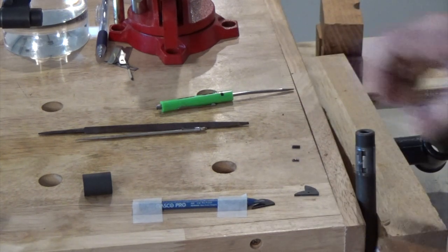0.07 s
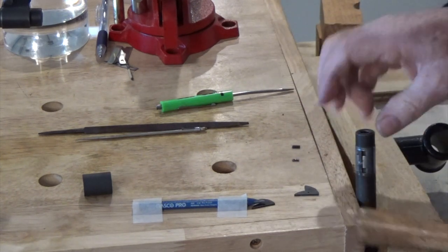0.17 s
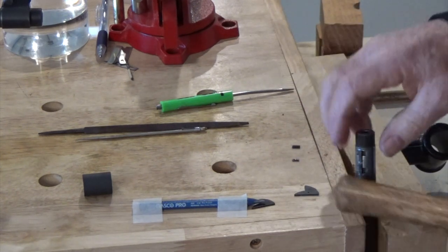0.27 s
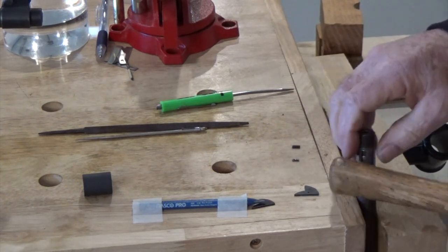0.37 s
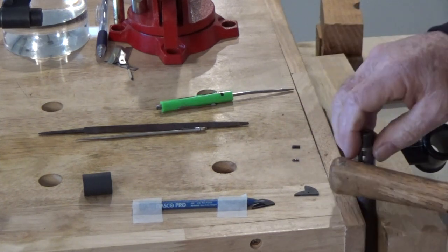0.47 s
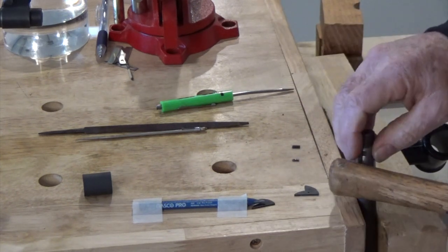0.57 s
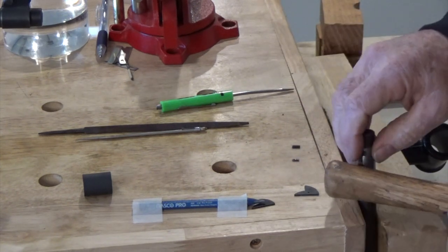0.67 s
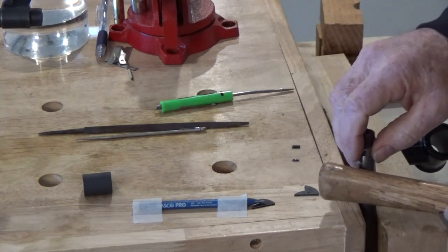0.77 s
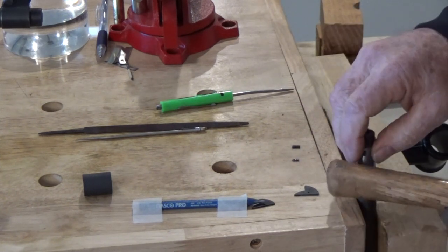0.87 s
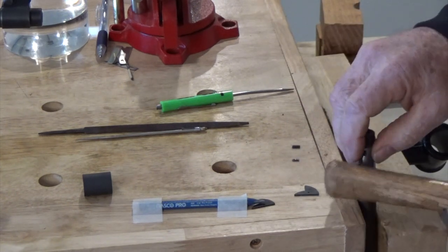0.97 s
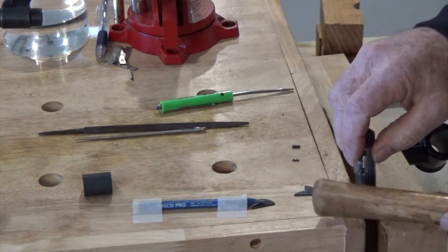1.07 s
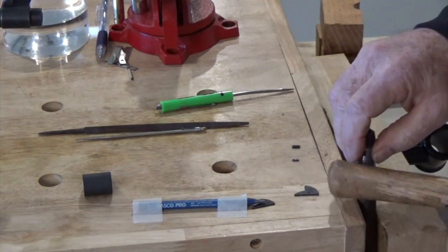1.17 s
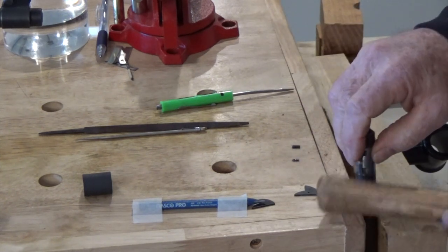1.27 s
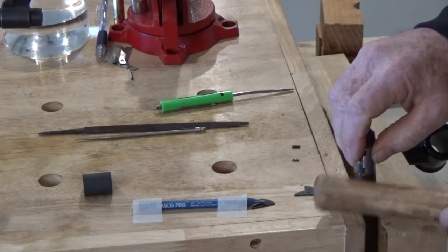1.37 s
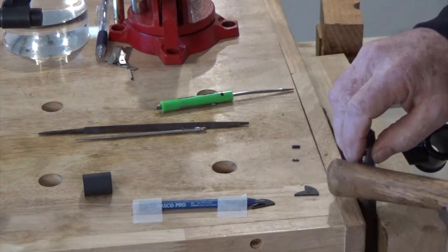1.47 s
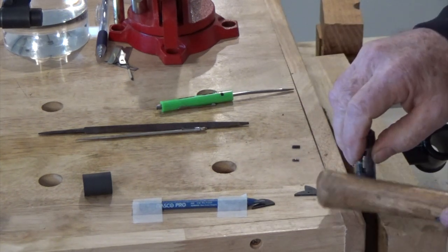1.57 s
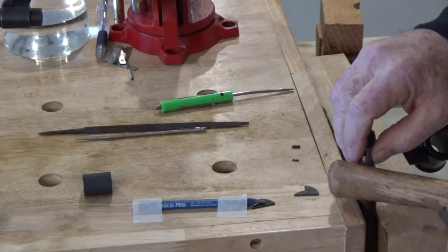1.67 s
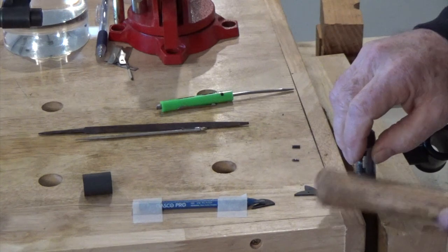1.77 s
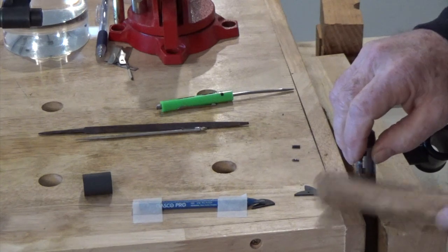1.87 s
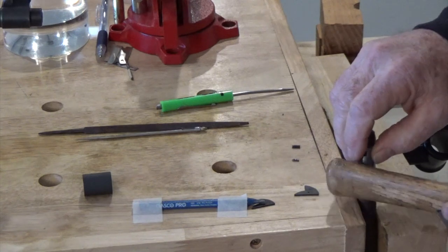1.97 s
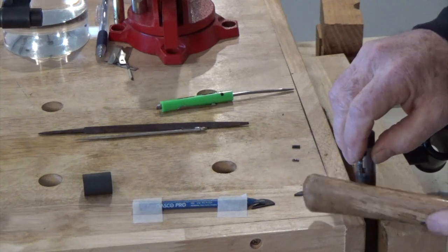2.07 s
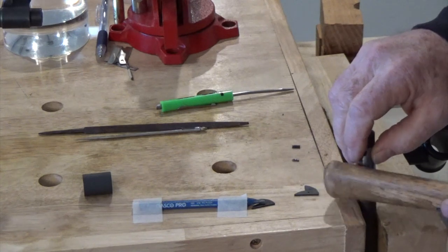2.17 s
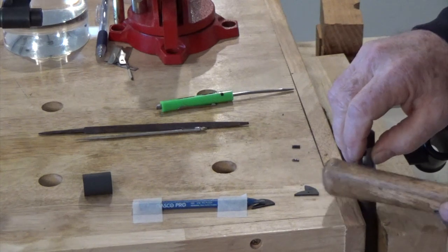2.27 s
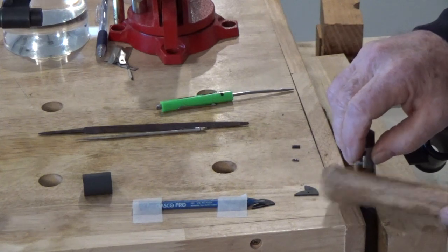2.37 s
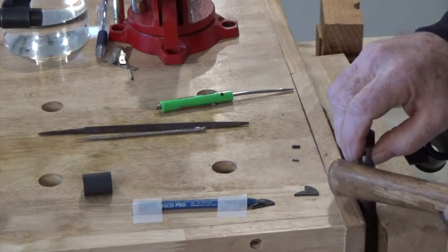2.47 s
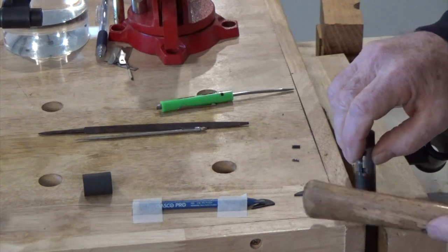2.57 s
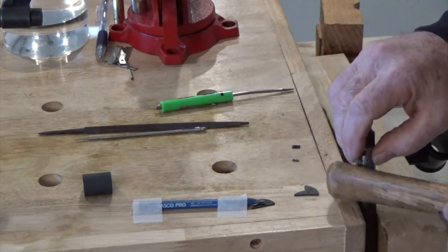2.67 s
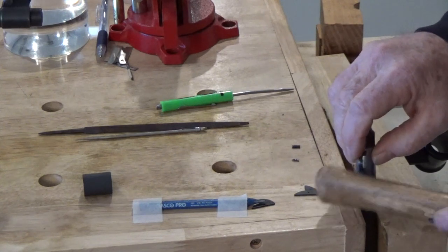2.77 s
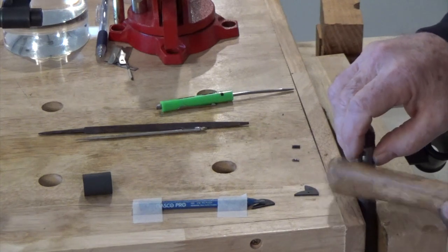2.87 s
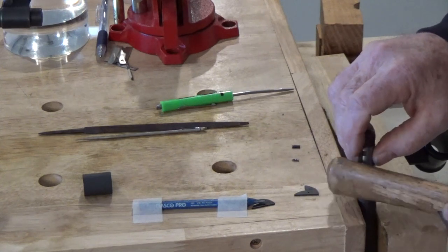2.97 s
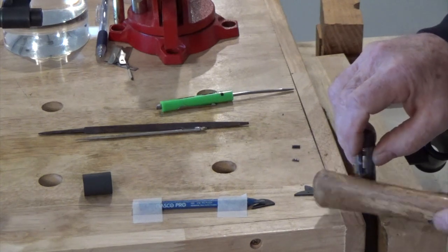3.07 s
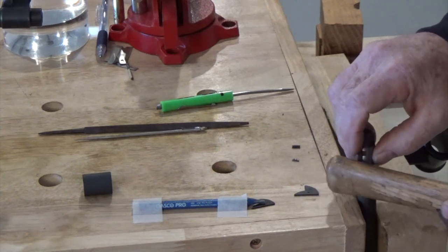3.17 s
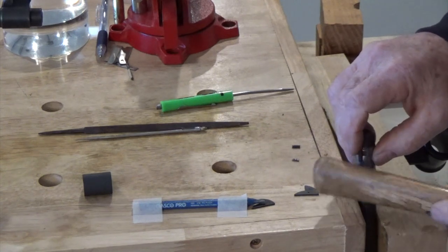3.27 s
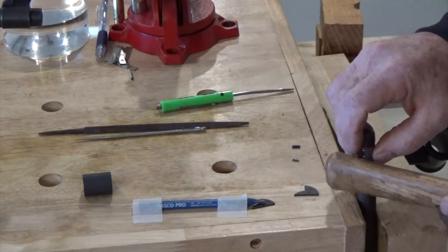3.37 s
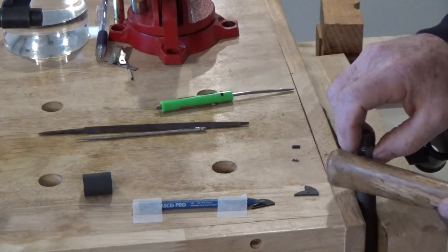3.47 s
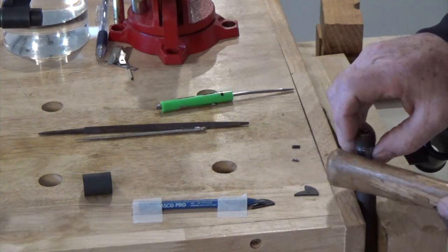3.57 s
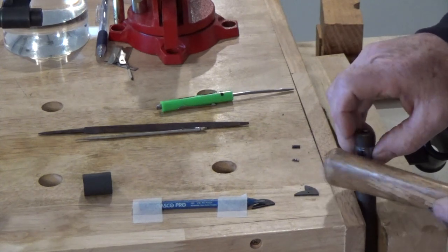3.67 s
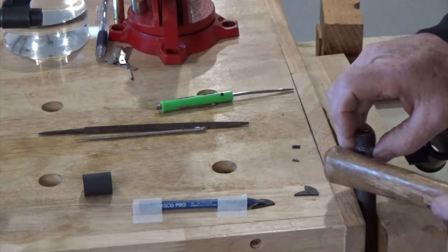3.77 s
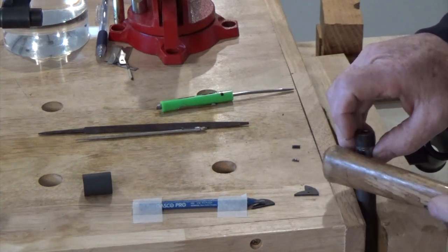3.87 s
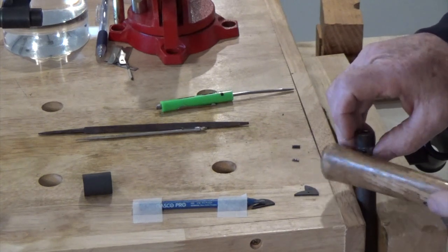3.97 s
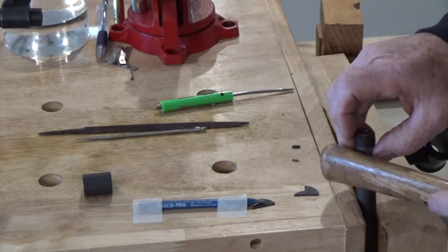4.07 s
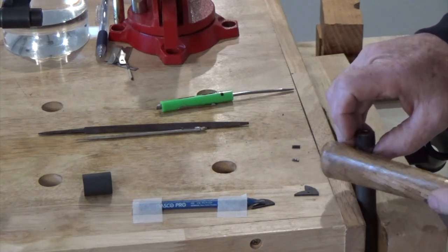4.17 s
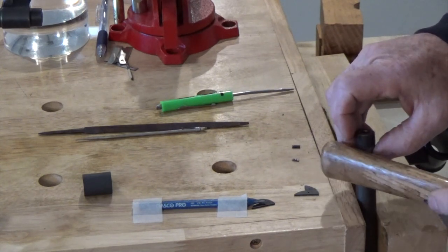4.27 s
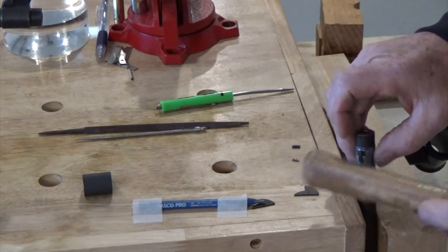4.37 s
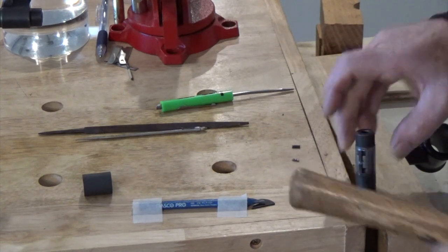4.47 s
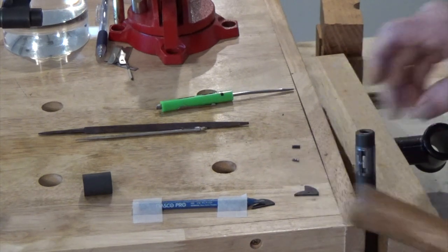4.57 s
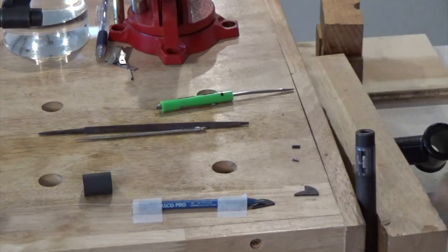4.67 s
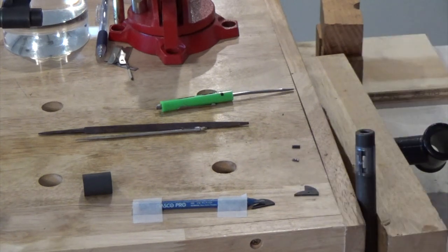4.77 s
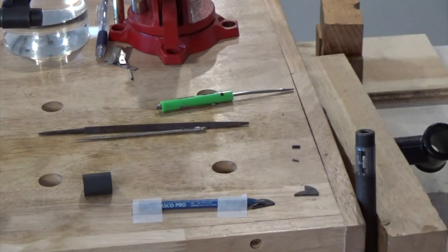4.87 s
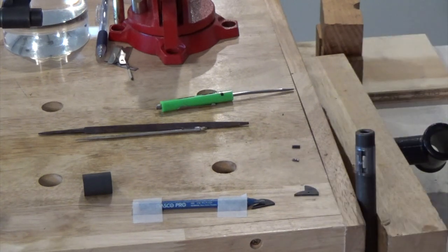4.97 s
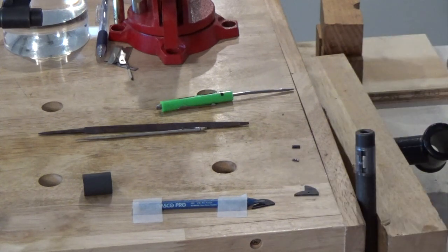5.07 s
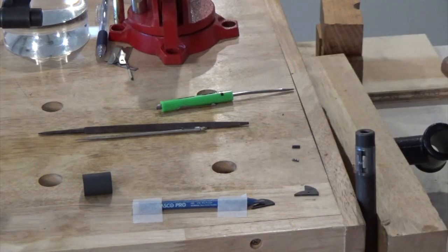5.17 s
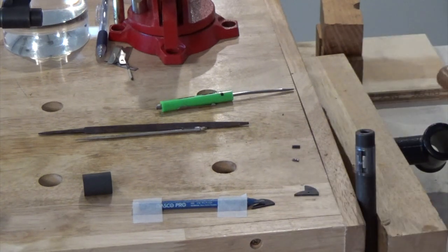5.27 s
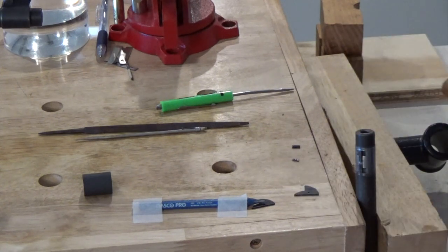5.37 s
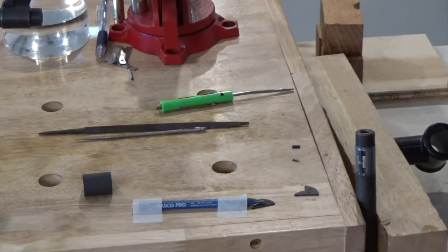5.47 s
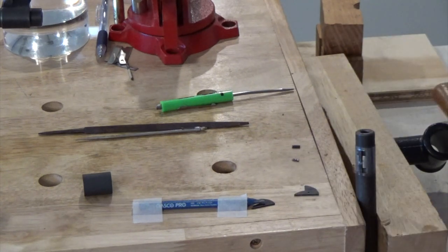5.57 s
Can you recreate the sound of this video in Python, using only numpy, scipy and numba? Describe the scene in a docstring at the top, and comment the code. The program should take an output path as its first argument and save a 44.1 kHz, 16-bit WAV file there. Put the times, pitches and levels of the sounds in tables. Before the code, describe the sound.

A wooden mallet strikes a small steel part clamped in a bench vise, roughly four blows a second, each a short tick with a damped metallic clank and woody knock. A couple of blows graze the wooden jaw more dully. The tapping stops, the hard room rings away, and the mallet is laid down with a small rattle. A close stereo microphone adds steady hiss.

```python
"""A wooden mallet taps a steel part held in a bench vise, about four blows a second, in a bare echoing workshop.
Each blow is a short tick plus brief damped rings of bench, jaws and steel; twice it grazes the wooden jaw.
At the end the mallet is laid on the bench with knocks and rattles. Echoes and a diffuse tail smear it all.
A small stereo microphone hears it over a steady hiss, through a gain control; the level dips once, briefly."""
import sys
import numpy as np
from scipy import signal
from scipy.fft import rfft, irfft
from scipy.io import wavfile
from numba import njit

SR = 44100
rng = np.random.default_rng(int(sys.argv[2]) if len(sys.argv) > 2 else 0)


def wrap_up_sound(samples):
    """Save the sound to the file named by the first command line argument, as 16-bit audio."""
    columns = np.atleast_2d(samples).T
    # keep every value between -1 and 1, then stretch to whole-number steps
    tamed = np.clip(columns, -1, 1)
    steps = np.round(tamed * 32767).astype(np.int16)
    wavfile.write(sys.argv[1], SR, steps)


N = 247401  # samples in the scene


def undb(db):
    """Decibels to gain."""
    return 10 ** (np.asarray(db) / 20)


MODE_SCATTER_DB = 1.6  # standard deviation of each mode's level from blow to blow
CONTACT_CYCLES = 1.6  # a mode takes about this many cycles to swing up under the push


def ring(modes, turn):
    """One blow on an object: its modes sound as damped sines, wider modes dying sooner; total energy 1."""
    hz, width, db = (column[:, None] for column in np.transpose(modes))
    width = np.abs(width)
    t = np.arange(SR // 4) / SR
    scatter_db = MODE_SCATTER_DB * rng.standard_normal(hz.shape)
    size = undb(db + scatter_db) * np.sqrt(width)
    # neighbouring modes start in opposite directions
    sign = (-1.) ** (turn + np.arange(len(hz)))[:, None]
    swing_up = 1 - np.exp(-t * hz / CONTACT_CYCLES)
    decay = np.exp(-np.pi * width * t)
    sound = np.sum(sign * size * swing_up * decay * np.sin(2 * np.pi * hz * t), axis=0)
    return sound / np.sqrt(np.sum(sound ** 2))


def blows(times, levels_db, objects):
    """Every blow sets every object ringing, each at the level in its own column."""
    out = np.zeros(N + SR)
    mode_counts = [len(modes) for modes in objects]
    turns = np.cumsum(mode_counts) - mode_counts
    for start, row in zip(times, levels_db):
        at = int(start * SR)
        for db, modes, turn in zip(row, objects, turns):
            sound = undb(db) * ring(modes, turn)
            out[at:at + len(sound)] += sound
    return out[:N]


# Mallet blows on the steel part. Each row: start in seconds, tick level in dB, strength in dB,
# bite in dB (how far the steel rings above the wood, higher for a hard square contact),
# aim in dB (up where the part is bent, down where the blow drives into the vise screw),
# depth in dB (up for a deeper clang).
TAPS = [(0.5729, -61, -50, -18, -7.5, -8.5), (0.8428, -36, -31, -25.5, -3, 1.5),
        (1.132, -37.5, -24.5, 0.5, 2.5, 4), (1.4068, -25, -21.5, -19.5, 1.5, -0.5),
        (1.6387, -27.5, -17, -12, -2.5, -1), (1.893, -39.5, -16.5, -2.3, 0.7, 1.5),
        (2.3869, -33.5, -20, 3.4, 0.4, -1.3), (2.6381, -31, -34, -11.5, -0.3, 1.6),
        (2.8775, -33, -16.5, -8.5, 3.5, -5.5), (3.1158, -40.5, -16, -3, -3, -5),
        (3.3465, -39, -29.5, -19, -1, -5), (3.5635, -36, -20, -9.5, 0.7, 5),
        (3.7719, -39, -14.5, -5, -4.5, -3), (3.9698, -34, -18.5, -5.5, -5, 0.2),
        (4.1764, -36.5, -18, -10, -4, 0.3)]
# How thud, jaws, screw, part, low clang, high clang, sizzle and crack answer a tap, one row for each.
# Each row: level in dB when the tap's four values are 0, then dB per dB of strength, bite, aim, depth.
ANSWERS = [(-24, .6, -0.082, 0.26, -0.099), (-1.16, 1.06, -0.055, -0.058, 0.098),
           (0.23, 1.064, .45, -0.64, 0.26), (-2, 0.88, 0.65, 0.93, 0.21), (4, 1.25, 0.72, 0.12, 0.95),
           (0.96, 1.093, 0.79, 0.091, 0.21), (-0.84, 1.353, 0.81, 0.11, -.4), (-6.5, 0.91, .35, 0.37, .4)]
# Bench thud. Each row: frequency in Hz, width in Hz, relative level in dB.
THUD = [(97, 210, -2.5), (148, 40, -3.5), (237.3, 35, -2), (296.6, 47, 1), (371.3, 21, -7.5),
        (448.4, 172, 5)]
# Vise jaws. Each row: frequency in Hz, width in Hz, relative level in dB.
JAWS = [(546, 100, -7.5), (695, 53, -7), (777.2, 21.7, -5), (845, 142, 1.5), (898.6, 140, -4.5),
        (1028.5, 98, -0.5), (1310, 450, 1.5)]
# Vise screw. Each row: frequency in Hz, width in Hz, relative level in dB.
SCREW = [(1283, 102, 3.5), (1212, 48, -9), (1372, 22, -2.5), (1427, 28, -5.5), (1499, 86, 3),
         (1566, 97, -5.5), (1773, 74, -5.5), (2358, 27, -9.5), (2497, 190, -3.5)]
# Steel part. Each row: frequency in Hz, width in Hz, relative level in dB.
PART = [(1051.4, 86, 6), (1850, 130, 0), (1898.4, 42, 1.5), (1976, 52, -1.5), (2037, 430, 0)]
# Lower steel clang. Each row: frequency in Hz, width in Hz, relative level in dB.
LOW_CLANG = [(2205, 47, -7.5), (2503, 150, -6.5), (2772, 580, 5.5), (3122, 460, 0.5), (3683, 270, -2.5),
             (3920, 280, 1)]
# Higher steel clang. Each row: frequency in Hz, width in Hz, relative level in dB.
HIGH_CLANG = [(4003, 550, 4.5), (4520, 370, 0.5), (4764, 370, -3), (4880, 190, 0.5), (5030, 920, -5),
              (5370, 213, -0.5)]
# Sizzle on top of the clang. Each row: frequency in Hz, width in Hz, relative level in dB.
SIZZLE = [(6445, 660, -0.5), (7240, 760, 2), (8230, 590, -5.5), (9580, 770, 0.5), (11550, 1500, -4)]
# Tick of the contact. Each row: frequency in Hz, width in Hz, relative level in dB.
TICK = [(2900, 1500, -2.5), (4800, 1700, -8), (6850, 2000, -4.5), (8700, 3900, 5), (11500, 2500, 2.5),
        (14000, 2500, -6.5)]
# Crack of a tap or a graze. Each row: frequency in Hz, width in Hz, relative level in dB.
CRACK = [(2970, 1600, 1.1), (4910, 950, -1.1)]


def mallet_taps():
    """Strength, bite, aim and depth of a blow decide how loudly wood, vise and steel answer it."""
    taps, answers = np.array(TAPS), np.array(ANSWERS)
    times, tick_db, character = taps[:, 0], taps[:, 1], taps[:, 2:]
    *bodies_db, crack_db = answers[:, :1] + answers[:, 1:] @ character.T
    objects = (THUD, JAWS, SCREW, PART, LOW_CLANG, HIGH_CLANG, SIZZLE)
    bodies = blows(times, np.transpose(bodies_db), objects)
    ticks = blows(times, np.transpose([tick_db, crack_db]), (TICK, CRACK))
    return bodies, ticks


# The mallet grazes the wooden jaw instead of the part.
# Each row: start in seconds, crack level in dB, thump level in dB, knock level in dB.
GRAZES = [(2.1511, -36.5, -37, -33), (2.651, -41, -34.5, -35)]
# Low thump of a graze. Each row: frequency in Hz, width in Hz, relative level in dB.
GRAZE_THUMP = [(200, 48, 1), (265, 130, -1.5)]
# Wooden knock of a graze. Each row: frequency in Hz, width in Hz, relative level in dB.
GRAZE_KNOCK = [(577, 81, -8), (789, 120, -0.5), (1055, 140, -1), (1645, 450, 5)]


def jaw_grazes():
    """A glancing blow on wood: a knock that fills the room, a crack and thump heard mostly direct."""
    grazes = np.array(GRAZES)
    bodies = blows(grazes[:, 0], grazes[:, 3:], (GRAZE_KNOCK,))
    ticks = blows(grazes[:, 0], grazes[:, 1:3], (CRACK, GRAZE_THUMP))
    return bodies, ticks


# Contacts as the mallet is laid on the bench.
# Each row: start in seconds, tick level in dB, knock level in dB, rattle level in dB.
LAID_DOWN = [(5.414, -48, -39, -52.5), (5.4765, -44.5, -24, -44), (5.4963, -63, -33, -39)]
# Knock on the bench. Each row: frequency in Hz, width in Hz, relative level in dB.
KNOCK = [(257, 48, 1.5), (320, 77, -5), (396, 70, 3.5), (527, 86, 0.5), (686, 270, 3), (830, 190, -1),
         (950, 320, -1.5), (1350, 320, -7.5)]
# Rattle at each contact. Each row: frequency in Hz, width in Hz, relative level in dB.
RATTLE = [(1700, 200, 7.5), (2060, 220, 3), (2610, 440, 3), (3220, 790, 3), (4220, 990, 1.5),
          (7100, 4700, -3)]
# Tick of wood on the bench. Each row: frequency in Hz, width in Hz, relative level in dB.
WOOD_TICK = [(2810, 900, 1.5), (3730, 880, 3.5), (4800, 950, 1), (7200, 1300, -10), (10600, 2500, -6)]


def mallet_laid_down():
    """Each contact with the bench rings a knock and a rattle under a wooden tick."""
    laid = np.array(LAID_DOWN)
    bodies = blows(laid[:, 0], laid[:, 2:], (KNOCK, RATTLE))
    ticks = blows(laid[:, 0], laid[:, 1:2], (WOOD_TICK,))
    return bodies, ticks


def along(hz, table, column):
    """A column of a table read on a log-frequency axis."""
    table = np.array(table, float)
    return np.interp(np.log(np.maximum(hz, 1)), np.log(np.maximum(table[:, 0], 1)), table[:, column])


# The bare workshop by band. Each row: frequency in Hz, t60 in seconds, build-up in ms, direct sound in dB,
# side minus mid of the tail in dB, left minus right in dB.
ROOM = [(125, 0.55, 6.7, 11.5, -26, -0.3), (250, 0.46, 8.1, 17, -32, 0.9), (500, 0.7, 14, 19.5, -14.5, 1.5),
        (910, 0.65, 3.4, 23, -9.5, 1.9), (1492, 0.75, 6.7, 24.5, -8, 1), (2100, 0.62, 26, 26, -7.5, 2),
        (4480, 0.6, 4.3, 22.5, -10.5, 0), (8000, 0.44, 4.9, 22, -13, 0), (13000, 0.3, 4, 22.5, -53.5, 0.6)]
# Strong reflections of the lower band, where the walls act as mirrors.
# Each row: delay in ms, level in dB against the direct sound.
ECHOES = [(4.5, 0.5), (9, -3), (15.5, 5.5), (24.5, 5), (27.5, 3.5)]
ECHO_SPLIT_HZ = 1700  # echoes below, clutter above
CLUTTER_MS, CLUTTER_DB = 4, -19  # tools and bench top scatter the direct sound for a few milliseconds
LEAD = 256  # samples of room response kept before the direct sound


def workshop():
    """Stereo responses: direct sound with a few echoes, and a diffuse tail that builds and dies band by band."""
    t = np.arange(SR) / SR
    hz = np.fft.rfftfreq(SR, 1 / SR)
    noise = rfft(rng.standard_normal((2, SR)))
    centres = np.log(np.array(ROOM)[:, 0])
    tail = 0
    for k, (_, t60, rise_ms, _, _, _) in enumerate(ROOM):
        share = np.interp(np.log(np.maximum(hz, 1)), centres, np.arange(len(ROOM)) == k)
        build_up = 1 - np.exp(-t * 1000 / rise_ms)
        tail = tail + irfft(noise * share, SR) * build_up * undb(-60 * t / t60)
    mid, side = rfft(tail)
    side = side * undb(along(hz, ROOM, column=4))

    high = 1 / (1 + (ECHO_SPLIT_HZ / np.maximum(hz, 1)) ** 4)
    early = 1
    for ms, db in ECHOES:
        early = early + undb(db) * (1 - high) * np.exp(-2j * np.pi * hz * ms / 1000)
    clutter = rng.standard_normal(SR) * undb(CLUTTER_DB) * np.exp(-t * 1000 / CLUTTER_MS)
    early = early + rfft(clutter) * high
    early = early * undb(along(hz, ROOM, column=3))

    # half the left-right difference goes to each channel
    lean = undb(along(hz, ROOM, column=5) / 2) ** np.array([[1], [-1]])
    early = irfft(lean * early, SR)
    tail = irfft(lean * np.array([mid + side, mid - side]), SR)
    return np.roll(early, LEAD, axis=1), np.roll(tail, LEAD, axis=1)


TICK_ROOM_DB = -19  # the tick leaves the near face towards the microphone, so little of it fills the room
MIC_LOW_HZ, MIC_HIGH_HZ = 150, 8790


def microphone(bodies, ticks):
    """The blows arrive direct and by way of the room, then pass through the microphone's gentle band limits."""
    early, tail = workshop()
    heard = signal.fftconvolve(bodies[None], early + tail, axes=1)
    heard = heard + signal.fftconvolve(ticks[None], early + undb(TICK_ROOM_DB) * tail, axes=1)
    band = signal.butter(1, [MIC_LOW_HZ, MIC_HIGH_HZ], "bandpass", fs=SR, output="sos")
    return signal.sosfilt(band, heard[:, LEAD:LEAD + N])


# Spectrum of the hiss. Each row: frequency in Hz, relative density in dB per Hz.
HUSH = [(15, -67), (25, -37), (48, -8), (87, -7.5), (235, -2), (284, -1.5), (415, 0.5), (815, -1.5),
        (984, -1), (1780, -3), (2150, -5), (3230, -4.5), (15900, -13.5)]
# Stereo spread of the hiss. Each row: frequency in Hz, side minus mid in dB.
HUSH_SIDE = [(60, -10.5), (110, -7), (200, -10), (380, -5), (700, -2), (1290, -1.5), (2380, -3.5),
             (4400, -11), (8120, -26), (15000, -35.5)]
# The hush drifts a little. Each row: time in seconds, level change in dB.
HUSH_SWELL = [(0, -2.5), (0.122, -1.5), (.8, -3), (4.699, 3), (5.098, 0), (5.6, -1)]
HUSH_DB = -65  # mid level before the drift


def hush():
    """Steady hiss of room air and microphone: shaped noise in mid and side, drifting slightly in level."""
    hz = np.fft.rfftfreq(N, 1 / SR)
    mid, side = rfft(rng.standard_normal((2, N))) * undb(along(hz, HUSH, column=1))
    mid = irfft(mid, N)
    side = irfft(side * undb(along(hz, HUSH_SIDE, column=1)), N)
    swell_db = np.interp(np.arange(N) / SR, *np.transpose(HUSH_SWELL))
    return np.array([mid + side, mid - side]) * undb(HUSH_DB + swell_db) / np.std(mid)


def scene():
    """Taps, grazes and the laid-down mallet in the room through the microphone's band, over the hush."""
    sources = [mallet_taps(), jaw_grazes(), mallet_laid_down()]
    bodies = sum(body for body, _ in sources)
    ticks = sum(tick for _, tick in sources)
    return microphone(bodies, ticks) + hush()


@njit
def follow(x, attack, release):
    """Envelope that rises fast and falls slowly."""
    y, e = np.empty(len(x)), 0.
    for i in range(len(x)):
        e += (x[i] - e) * (attack if x[i] > e else release)
        y[i] = e
    return y


LIMIT_DB, LIMIT_RATIO = -16, 1.95  # above this level the gain control compresses by this ratio
ATTACK_MS, RELEASE_MS = .7, 17
# The level dips briefly. One row: centre in seconds, half width in ms, depth in dB.
LEVEL_DIP = (4.963, 6, -16)
CEILING = .9  # amplitude that peaks round off towards, before the top is cut
TOP_HZ = 16300


def record(dry):
    """Gain control turns loud passages down, the level dips once, peaks round off, the top is cut."""
    loudest = np.abs(dry).max(axis=0)
    envelope = follow(loudest, 1000 / (ATTACK_MS * SR), 1000 / (RELEASE_MS * SR))
    gain = np.minimum(1, undb(LIMIT_DB) / (envelope + 1e-9)) ** (1 - 1 / LIMIT_RATIO)
    centre, half_width_ms, depth_db = LEVEL_DIP
    from_centre_ms = (np.arange(N) / SR - centre) * 1000
    gain = gain * undb(depth_db * np.exp(-(from_centre_ms / half_width_ms) ** 2))
    rounded = CEILING * np.tanh(dry * gain / CEILING)
    top_cut = signal.ellip(8, .2, 70, TOP_HZ, fs=SR, output="sos")
    return signal.sosfilt(top_cut, rounded)


dry = scene()
out = record(dry)
wrap_up_sound(out)
```